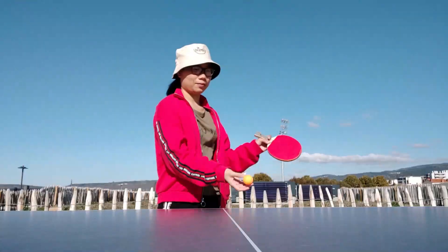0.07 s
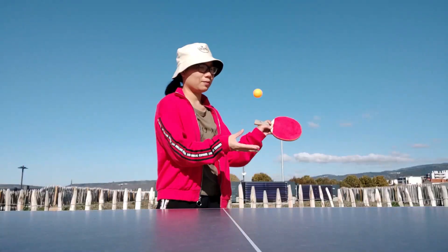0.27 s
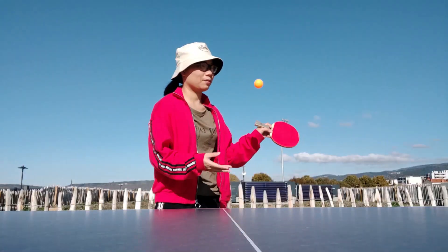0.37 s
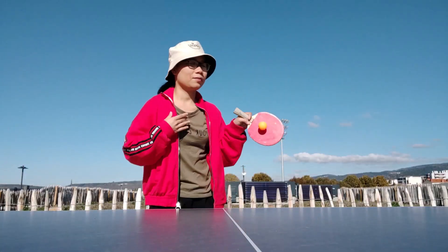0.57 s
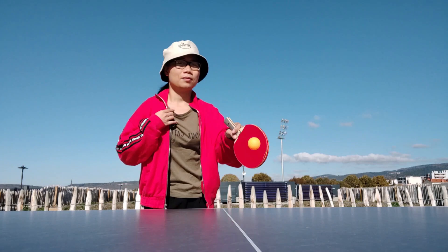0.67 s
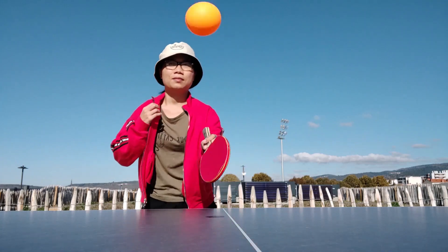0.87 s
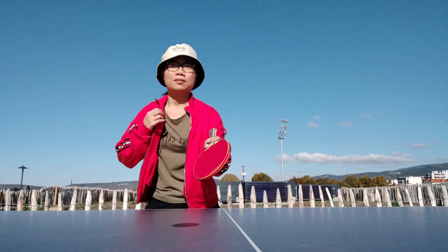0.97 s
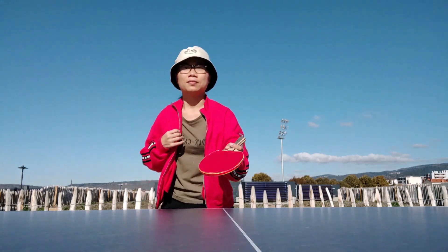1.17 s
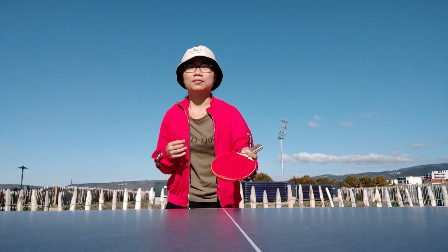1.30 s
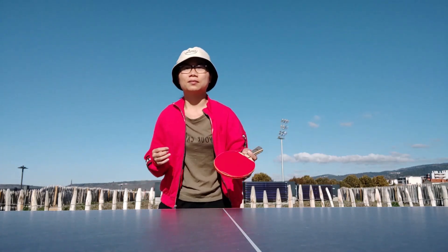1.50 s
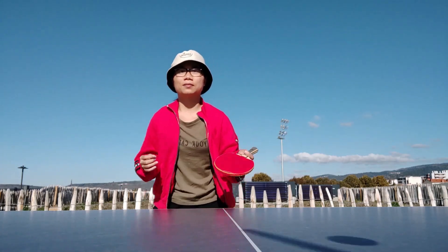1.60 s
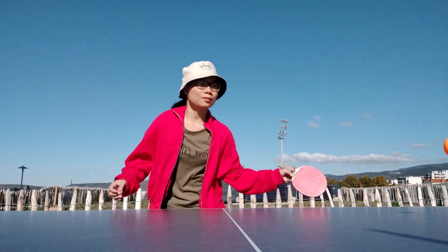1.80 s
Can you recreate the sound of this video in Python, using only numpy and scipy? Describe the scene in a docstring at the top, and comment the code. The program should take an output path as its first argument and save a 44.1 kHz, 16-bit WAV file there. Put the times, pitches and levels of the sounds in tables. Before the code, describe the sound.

A table tennis ball clicks four times off paddle and table in light outdoor wind.

```python
"""Table tennis outdoors

A ball is served and returned close by: paddle, table, table, paddle. Its thin shell pings near
8.6 kHz at every hit, the wooden paddle rings with one clear note, and the table knocks and rumbles.
Light wind and far traffic lie behind; an automatic volume control turns all down after loud hits."""
import sys
import numpy as np
from scipy import signal
from scipy.fft import rfft, irfft
from scipy.io import wavfile
from scipy.ndimage import uniform_filter1d, minimum_filter1d

SR = 44100
rng = np.random.default_rng(int(sys.argv[2]) if len(sys.argv) > 2 else 0)


def wav_record(signal):
    """Record a signal, one row per channel, as 16-bit PCM in the file named by sys.argv[1]."""
    frames = np.transpose(np.atleast_2d(signal))
    bounded = np.clip(frames, -1, 1)
    # unit amplitude maps onto the largest positive 16-bit level
    quanta = np.round(bounded * 32767).astype(np.int16)
    wavfile.write(sys.argv[1], SR, quanta)


N = 81585
T = np.arange(N) / SR


def from_db(db):
    """Turn decibels into a number to multiply by."""
    return 10 ** (np.asarray(db) / 20)


def at_hz(points, hz, column=1):
    """Look up a table's value at a pitch, gliding between its rows."""
    rows = np.array(points)
    return np.interp(np.log(hz), np.log(rows[:, 0]), rows[:, column])


def fade(points):
    """A volume curve through rows of t/s, level/dB."""
    return from_db(np.interp(T, *np.transpose(points)))


def pan(db):
    """Make the left side louder than the right by db (negative: the right is louder)."""
    return from_db(np.array([[db], [-db]]) / 2)


def since(start, lag_ms=0):
    """Seconds since a hit, for each ear; the left hears it lag_ms later."""
    return np.maximum(T - start - np.array([[lag_ms / 1000], [0]]), 0)


def rise(t, seconds):
    """A quick fade-in from 0 to 1."""
    return 1 - np.exp(-t / seconds)


def ring(t, tones, hz=1, ring_share=1):
    """A struck object's fading tones. A ring time, here and in the tables, is the time to drop 60 dB."""
    return sum(from_db(db - 60 * t / (ring_s * ring_share)) * np.sin(2 * np.pi * hz * ratio * t)
               for ratio, db, ring_s in tones)


def drift(per_second):
    """A slow random wobble, about 1 in size."""
    steps = max(int(per_second * N / SR), 2)
    return np.interp(T, np.linspace(0, T[-1], steps), rng.standard_normal(steps))


def narrow_noise(hz, width_hz):
    """Noise around one pitch, different in each ear."""
    edges = [hz - width_hz / 2, hz + width_hz / 2]
    bandpass = signal.butter(2, edges, "band", fs=SR, output="sos")
    band = signal.sosfilt(bandpass, rng.standard_normal((2, N)))
    return band / band.std()


# how alike noise is in the two ears: f/Hz, likeness (1 = the same)
EAR_LIKENESS = [(50, 0.92), (250, 0.92), (1000, 0.26), (3000, 0.05), (9000, 0.071)]


def noise_bands(colour):
    """Stereo noise in slices, low to high. The colour sets their balance, not the overall volume."""
    edges = 20 * 2 ** (np.arange(30) / 3)
    centres = np.sqrt(edges[1:] * edges[:-1])
    gains = from_db(at_hz(colour, centres))
    gains = gains / np.sqrt(np.sum(gains ** 2 * np.diff(edges)) * 2 / SR)
    white = rfft(rng.standard_normal((2, N)))
    f = np.arange(white.shape[1]) * SR / N
    for low, high, hz, gain in zip(edges, edges[1:], centres, gains):
        mid, side = irfft(white * ((f >= low) & (f < high)), N)
        alike = at_hz(EAR_LIKENESS, hz)
        shared = np.sqrt((1 + alike) / 2) * mid
        opposite = np.sqrt((1 - alike) / 2) * side * [[1], [-1]]
        yield hz, gain * (shared + opposite)


def dying_noise(colour, hits, delay_s):
    """Each hit (t/s, level/dB) starts a fading noise; it builds in delay_s at 500 Hz, slower below."""
    out = 0
    for hz, band in noise_bands(colour):
        travel_s = delay_s * np.sqrt(500 / hz)
        ring_s = at_hz(colour, hz, column=2)
        for start, db in hits:
            t = np.maximum(T - start, 0)
            arrival = 1 - np.exp(-(t / travel_s) ** 2)
            out = out + band * arrival * from_db(db - 60 * t / ring_s)
    return out


# which side the background leans to: f/Hz, pan/dB
AIR_PAN = [(50, 4), (250, 4.5), (1000, 2), (8000, -2)]


def air(level, colour):
    """Outdoor noise that follows a volume curve, its low notes a little to the left."""
    noise = sum(band * pan(at_hz(AIR_PAN, hz)) for hz, band in noise_bands(colour))
    return noise * fade(level)


# the wind's rumble over time: t/s, level/dB
RUMBLE_LEVEL = [(0, -38), (.04, -42), (.3, -43), (.39, -43), (.435, -30), (.66, -33), (.76, -42.5),
                (1.2, -42), (1.5, -50), (1.85, -39)]
# its balance of low and high: f/Hz, level/dB
RUMBLE_COLOUR = [(20, 12.5), (36, 5), (47, 9.5), (62, -4.5), (100, -7), (200, -34), (500, -39), (3000, -87)]


def wind_rumble():
    """Deep wind that comes in uneven gusts."""
    return air(RUMBLE_LEVEL, RUMBLE_COLOUR) * from_db(2 * drift(per_second=11))


# the air's hiss over time: t/s, level/dB
HISS_LEVEL = [(0, -57), (.03, -65), (.042, -46.5), (.3, -47.5), (.68, -49), (.85, -54), (.95, -56),
              (1.17, -52), (1.32, -52), (1.39, -58), (1.48, -56), (1.56, -53), (1.64, -53.5), (1.85, -53.5)]
# its balance of low and high: f/Hz, level/dB
HISS_COLOUR = [(1000, -25), (2500, 7), (4000, -3.5), (8300, 1.5), (10000, -8.5), (13000, -1.5),
               (16000, -47)]


def air_hiss():
    """The thin, high hiss of open air."""
    return air(HISS_LEVEL, HISS_COLOUR)


# the breeze over time: t/s, level/dB
BREEZE_LEVEL = [(0, -50), (.03, -66), (.042, -34), (.24, -33.5), (.39, -34.5), (.48, -45.5), (.68, -47),
                (.9, -61), (1.85, -57)]
# its balance of low and high: f/Hz, level/dB
BREEZE_COLOUR = [(150, 1), (400, -4.5), (900, 3.5), (1400, -0.5), (2200, -12), (3500, -23.5), (8000, -36),
                 (11000, -71)]


def breeze():
    """Light wind rushes softly, then dies down."""
    return air(BREEZE_LEVEL, BREEZE_COLOUR)


# far traffic over time: t/s, level/dB
TRAFFIC_LEVEL = [(0, -48.5), (.03, -58), (.045, -32.5), (.2, -34), (.5, -33.5), (.7, -36), (1.2, -38),
                 (1.85, -40)]
# its balance of low and high: f/Hz, level/dB
TRAFFIC_COLOUR = [(60, -4.5), (105, -11), (145, -3.5), (180, -3), (245, -2), (340, -11), (500, -5.5),
                  (900, -13), (1800, -21.5), (3500, -34), (8300, -37), (16000, -102)]


def far_traffic():
    """Distant traffic blurs into a dull murmur."""
    return air(TRAFFIC_LEVEL, TRAFFIC_COLOUR)


# the hum's tones: multiple of the lowest pitch, level/dB
HUM_TONES = [(1, -38), (2, -45.5), (3, -45.5), (5, -44)]
# the whole hum over time: t/s, level/dB
HUM_LEVEL = [(0, -46), (.05, 1.5), (.6, 4), (.8, -9), (1.2, -1.5), (1.85, -4.5)]
HUM_HZ, HUM_WANDER_HZ, HUM_FLUTTER_DB = 47.8, 1.4, 1.5


def hum():
    """Low tones waver in pitch and strength, like a far engine idling."""
    phase = 2 * np.pi * np.cumsum(HUM_HZ + HUM_WANDER_HZ * drift(per_second=6.1)) / SR
    tones = 0
    for multiple, db in HUM_TONES:
        strength = from_db(db + HUM_FLUTTER_DB * drift(per_second=18))
        tones += strength * np.sin(multiple * phase + rng.uniform(0, 2 * np.pi))
    return tones * fade(HUM_LEVEL) * pan(at_hz(AIR_PAN, HUM_HZ))


# the traffic's drone over time: t/s, level/dB
DRONE_LEVEL = [(0, -61), (.08, -35), (.25, -31), (.45, -37), (.6, -44.5), (.8, -52), (1.05, -41.5),
               (1.24, -37), (1.4, -39.5), (1.6, -46.5), (1.85, -56.5)]
DRONE_HZ = 245.5


def traffic_drone():
    """Far traffic drones around one low pitch, swelling and fading twice."""
    noise = narrow_noise(DRONE_HZ, width_hz=74)[0]
    return noise * fade(DRONE_LEVEL) * pan(at_hz(AIR_PAN, DRONE_HZ))


# background swishes and low swells: middle t/s, half length/s, f/Hz, width/Hz, level/dB
SWISHES = [(0.065, 0.027, 1148, 70, -37.5), (0.102, 0.063, 4310, 200, -55.5), (0.383, 0.042, 790, 92, -32),
           (0.392, 0.05, 1523, 82, -49), (0.464, .035, 144.3, 24, -36.5), (1.506, .08, 143, 31, -40)]


def swishes():
    """Faint patches of noise come and go, each around its own pitch."""
    return sum(narrow_noise(hz, width_hz) * from_db(db) * np.exp(-((T - middle) / half_s) ** 4)
               for middle, half_s, hz, width_hz, db in SWISHES)


# paddle hits: t/s, level/dB, wood note f/Hz, ping level/dB, ping pan/dB, note pan/dB, ping lag/ms,
# wood lag/ms, pitch factor for the wood's higher tones, tick level/dB, tick pan/dB
STROKES = [(0.6939, 1, 912.4, 2.5, 4.5, 3, 0.033, -0.017, 0.997, -1, -13),
           (1.5702, 4.5, 947, 7, 7.5, 1.5, 0.176, 0.13, 1.094, -2.5, 11)]
# higher tones of the rubber-covered wood: ratio to its note, ring/s, level/dB on hit 1, on hit 2
WOOD_TONES = [(1.24, 0.0093, 1, -2.5), (1.5, 0.0027, -31, 2.5), (2.17, 0.007, 1, -5), (2.6, 0.0047, 4, 0.5),
              (2.9, 0.0081, -2.5, -3), (3.2, 0.0097, -12.5, -14.5), (4.25, 0.0054, -12.5, -9),
              (5.9, 0.0034, -20, -29)]
# tones of the ball's shell: ratio to its main pitch, level/dB, ring/s
SHELL_TONES = [(0.9995, 3, 0.013), (0.88, -7, 0.0007), (0.976, -7.5, 0.017), (1.3, -36, 0.016)]
# the ball's flattened spot springing back: ratio to its main pitch, level/dB, ring/s
SHELL_DENT = [(0.861, -2.5, 0.0069)]
# sound thrown back by the player and the surroundings: f/Hz, level/dB, ring/s
SCATTER = [(200, 2, 0.02), (594, 4.5, 0.094), (1280, 16, 0.021), (2130, 0.5, 0.083), (3180, -19, 0.013),
           (5000, -19, 0.018), (8700, -5, 0.071), (11100, -8, 0.026), (13000, -44, .012)]
PING_HZ, RUBBER_RING_SHARE = 8660, 0.22
WOOD_NOTE_DB, WOOD_RING_S, WOOD_AFTER_S = 2, 0.065, 0.000318


def paddle():
    """The ball pings, cut short by the rubber; the wood cracks, then its note swells and rings."""
    out = dying_noise(SCATTER, [row[:2] for row in STROKES], delay_s=0.00033) * from_db(-18.5)
    for hit, stroke in enumerate(STROKES):
        start, db, hz, ping_db, ping_pan, note_pan, ping_lag, wood_lag, stretch, *_ = stroke
        t = since(start + WOOD_AFTER_S, wood_lag)
        note = ring(t, [(1, WOOD_NOTE_DB, WOOD_RING_S)], hz) * rise(t, 0.0022)
        tones = [ring(t, [(ratio, levels[hit], ring_s)], hz * stretch)
                 for ratio, ring_s, *levels in WOOD_TONES]
        directions = (-1, -1, 1, -1, 1, -1, 1, -1)   # which way each tone swings first
        crack = sum(way * tone for way, tone in zip(directions, tones)) * rise(t, 0.00015)
        t = since(start, ping_lag)
        shell = ring(t, SHELL_TONES + SHELL_DENT, PING_HZ, RUBBER_RING_SHARE)
        ping = from_db(ping_db) * shell * rise(t, 0.00044)
        out += from_db(db) * (note * pan(note_pan) + crack * pan(db=-2.3) + ping * pan(ping_pan))
    return out


# the tick as the ball first touches: f/Hz, level/dB, ring/s
TICK_COLOUR = [(990, -4, 0.0041), (3040, 5.5, 0.0053), (4070, 3.5, 0.0078), (5400, -23, 0.007),
               (8050, -21, 0.0017), (11260, -1.5, 0.012), (13700, -11.5, 0.005), (16100, -18, .004)]
TICK_DB = -14


def ticks():
    """Every hit, on paddle or table, opens with a dry tick of noise."""
    return sum(dying_noise(TICK_COLOUR, [(start, db + TICK_DB + tick_db)], delay_s=0.00096) * pan(side)
               for start, db, *_, tick_db, side in STROKES + BOUNCES)


def ping_echoes(echo_db=-45, ring_s=0.3, rubber_db=-3.5):
    """The ping returns from the surroundings as a soft shimmer, weaker after a hit on rubber."""
    hits = [(start, db + rubber_db) for start, db, *_ in STROKES] + [row[:2] for row in BOUNCES]
    level = sum((T > start) * from_db(db - 60 * since(start) / ring_s) for start, db in hits)
    return from_db(echo_db) * level * narrow_noise(PING_HZ, width_hz=320)


# bounces on the table: t/s, level/dB, knock f/Hz, ping f/Hz, ping pan/dB, tabletop level/dB, lag/ms,
# level/dB of the shell's lowest tone, tick level/dB, tick and knock pan/dB
BOUNCES = [(0.8696, 6.5, 1902, 8570, 1.5, 2, 0.036, -49, 3, -2.5),
           (1.334, 1, 1676, 8390, 12, 3.5, .15, -33, 4, -1.5)]
# tones of the spot the ball lands on: ratio to the knock's pitch, level/dB, ring/s
KNOCK_TONES = [(0.989, 2.5, 0.013), (1.096, -10, 0.017), (0.815, -3, 0.0077), (1.813, -5.5, 0.0043),
               (2.9, -7.5, 0.0037)]
# tones of the whole tabletop: f/Hz, ring/s, level/dB on bounce 1, on bounce 2
TABLETOP_TONES = [(149.1, 0.53, -39, -36.5), (200, 0.21, -29.5, -30.5), (254.7, 0.27, -42, -27.5),
                  (339.7, 0.16, -29.5, -27), (383, 0.057, -52, -27), (526.5, 0.071, -25, -33),
                  (596, 0.064, -42, -39), (690, 0.15, -31, -53), (827, 0.17, -41.5, -31),
                  (970, 0.094, -41, -35), (1137, 0.26, -45, -47), (1303, 0.026, -53, -19.5),
                  (1640, 0.045, -25, -25), (1870, 0.12, -36, -49), (2055, 0.033, -26.5, -23)]
# its many weaker tones, blurred into noise: f/Hz, level/dB, ring/s
TABLETOP_BLUR = [(150, -6, 0.43), (298, -3, 0.26), (716, 0, 0.12), (1280, -10.5, 0.17), (1960, -9, 0.13),
                 (3030, -19.5, 0.061), (5900, -8.5, 0.017), (8500, -14.5, 0.045), (11500, -26, 0.053),
                 (14000, -50, .012)]
TRAVEL_S = 0.00402   # time a 500 Hz ripple takes through the tabletop; higher ones are faster
PING_DB, PING_AFTER_S = -1, 0.000797
SHELL_LOW_HZ, SHELL_LOW_RING_S = 5836, 0.1   # the shell's lowest tone rings longest


def table_bounces():
    """The ball knocks on the table, its shell rings freely, and the tabletop rumbles."""
    hits = [(row[0], row[1] + row[5]) for row in BOUNCES]   # bounce level plus tabletop level
    out = from_db(-22) * dying_noise(TABLETOP_BLUR, hits, TRAVEL_S)
    for hit, bounce in enumerate(BOUNCES):
        start, db, knock_hz, ping_hz, ping_pan, top_db, lag, low_db, _, knock_pan = bounce
        t = since(start, lag)
        knock = ring(t, KNOCK_TONES, knock_hz) * rise(t, 0.00061)
        dent = ring(t, SHELL_DENT, ping_hz) * rise(t, 0.00032)
        t = since(start + PING_AFTER_S, lag)
        ping = from_db(PING_DB) * ring(t, SHELL_TONES, ping_hz) * rise(t, 0.00032)
        low_ring = ring(t, [(SHELL_LOW_HZ, low_db, SHELL_LOW_RING_S)])
        tabletop = 0
        for hz, ring_s, *levels in TABLETOP_TONES:
            t = since(start + TRAVEL_S * np.sqrt(500 / hz), lag)
            tabletop += ring(t, [(hz, top_db + levels[hit], ring_s)])
        impact = (knock + dent) * pan(knock_pan)
        out += from_db(db) * (impact + ping * pan(ping_pan) + low_ring + tabletop * pan(db=10.5))
    return out


# ripples in the tabletop, direct or back from its edge:
# bounce t/s, travel time at 500 Hz/s, level/dB, strongest f/Hz, pan/dB
RIPPLES = [(0.8696, .016, -10, 630, 5), (1.334, 0.0062, -21.5, 595, 10), (1.3342, .028, -23, 306, 2)]


def table_ripples(top_hz=2210, spread_octaves=0.89):
    """A bounce bends the tabletop. High ripples outrun low ones, so each knock falls fast in pitch."""
    out = 0
    for start, travel_s, db, strongest_hz, side in RIPPLES:
        first_arrival_s = travel_s * np.sqrt(500 / top_hz)
        hz = 500 * (travel_s / (first_arrival_s + since(start))) ** 2
        octaves_away = np.log2(hz / strongest_hz)
        strength = (T > start) * np.exp(-(octaves_away / spread_octaves) ** 2 / 2)
        phase = 2 * np.pi * np.cumsum(hz * (T > start), axis=1) / SR
        out += from_db(db) * pan(side) * strength * np.sin(phase)
    return out


def scene(edge_hz=9100, leak_db=-19):
    """Four hits over wind and far traffic, whose hiss drops steeply above edge_hz."""
    outdoors = wind_rumble() + air_hiss() + breeze() + far_traffic()
    treble_cut = signal.cheby1(12, 0.5, edge_hz, fs=SR, output="sos")
    outdoors = signal.sosfilt(treble_cut, outdoors) + from_db(leak_db) * outdoors
    rally = ticks() + paddle() + table_bounces() + table_ripples() + ping_echoes()
    return rally + outdoors + swishes() + hum() + traffic_drone()


def volume_control(x, threshold_db=-2.5, hold_s=0.064, recover_db_per_s=53, ahead_s=0.001):
    """Loud peaks turn the volume down; it stays there a moment, then creeps back."""
    power = uniform_filter1d(np.max(x ** 2, axis=0), size=88)
    excess_db = np.maximum(10 * np.log10(np.maximum(power, 1e-12)) - threshold_db, 0)
    half_hold = int(hold_s * SR) // 2
    held_db = -minimum_filter1d(-excess_db, 2 * half_hold + 1, origin=half_hold)
    cut_db = np.maximum.accumulate(held_db + recover_db_per_s * T) - recover_db_per_s * T
    smooth_db = uniform_filter1d(cut_db, size=44)
    return x * from_db(-np.interp(T + ahead_s, T, smooth_db))


def limiter(x):
    """A very quick dip in volume keeps the sharpest peaks from going past 1."""
    gain = np.minimum(1, 1 / (np.max(abs(x), axis=0) + 1e-9))
    return x * uniform_filter1d(minimum_filter1d(gain, size=41), size=41)


def record(dry):
    """Turn down loud hits, tame their peaks and remove the very highest treble."""
    levelled = limiter(volume_control(dry))
    treble_cut = signal.firwin(129, cutoff=16100, fs=SR)
    return signal.fftconvolve(levelled, treble_cut[None], mode="same", axes=1)


dry = scene()
out = record(dry)
wav_record(out)
```